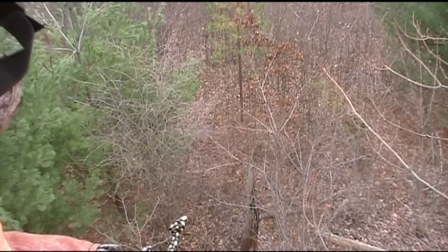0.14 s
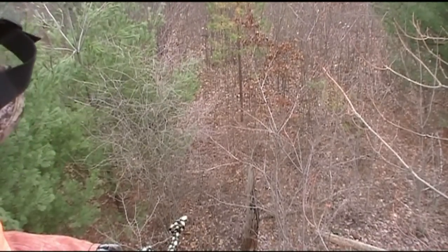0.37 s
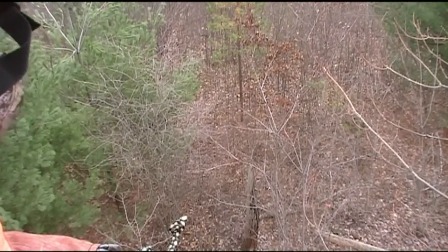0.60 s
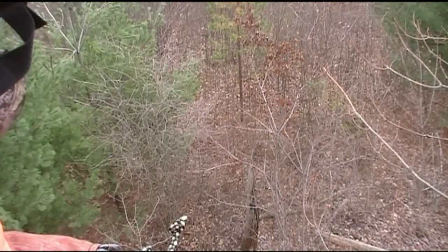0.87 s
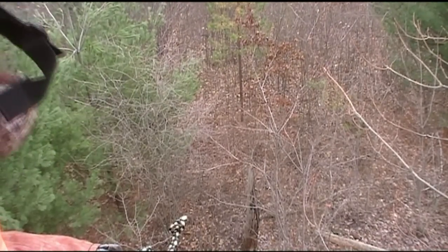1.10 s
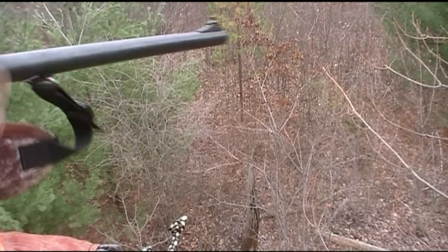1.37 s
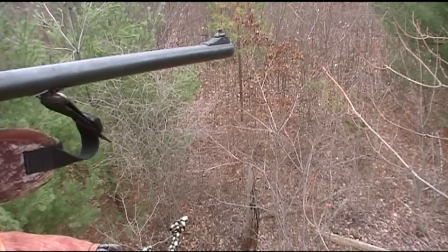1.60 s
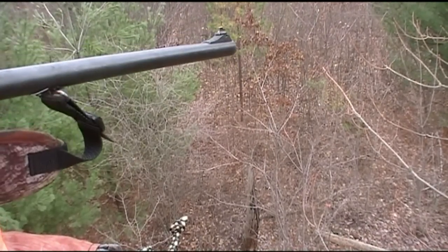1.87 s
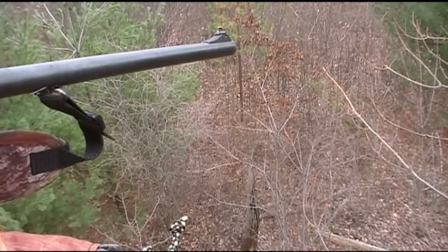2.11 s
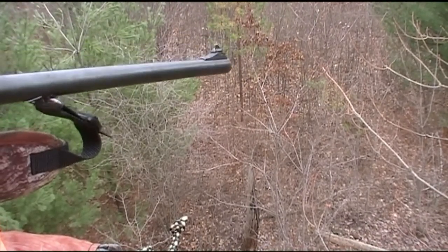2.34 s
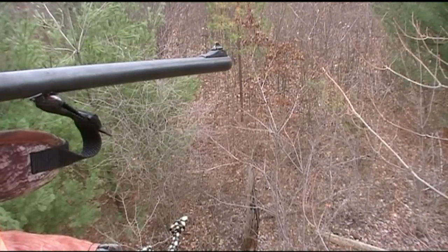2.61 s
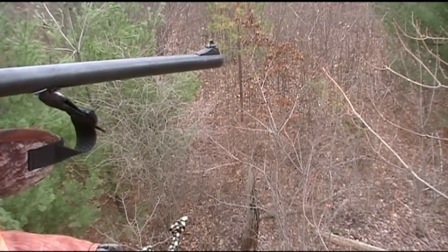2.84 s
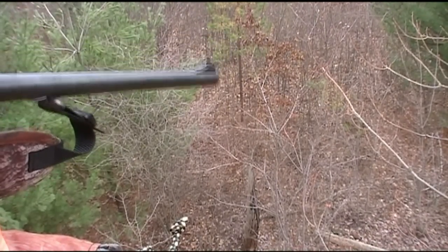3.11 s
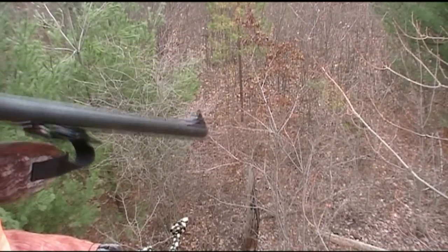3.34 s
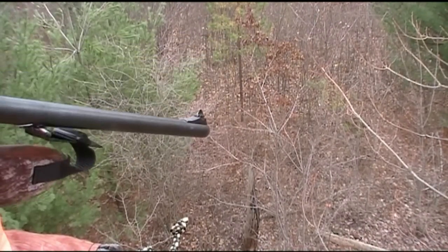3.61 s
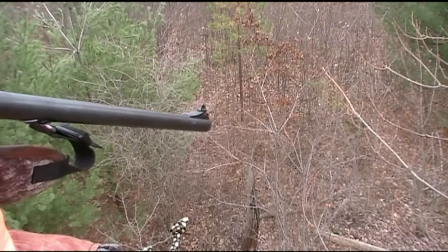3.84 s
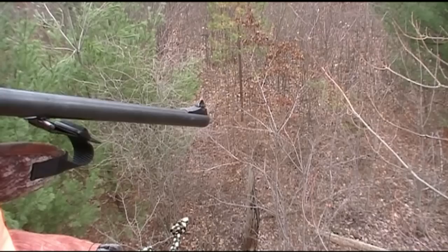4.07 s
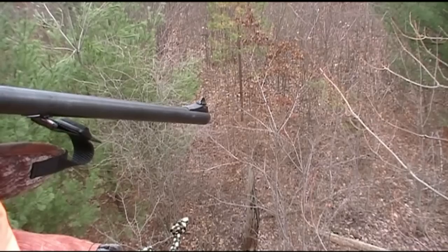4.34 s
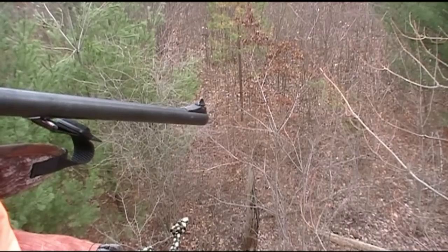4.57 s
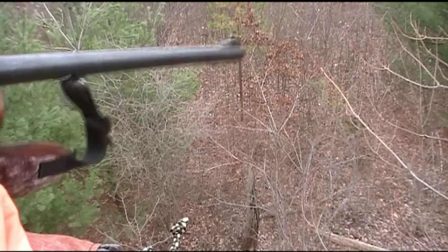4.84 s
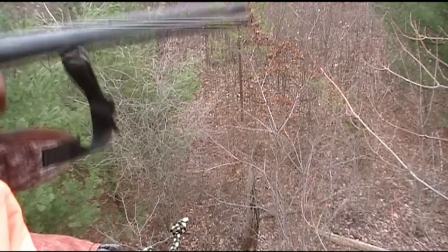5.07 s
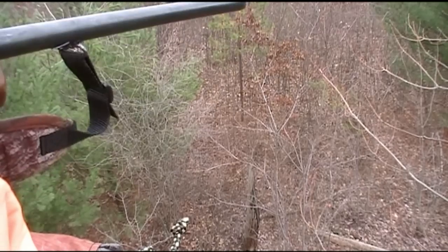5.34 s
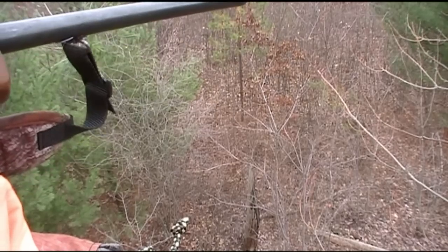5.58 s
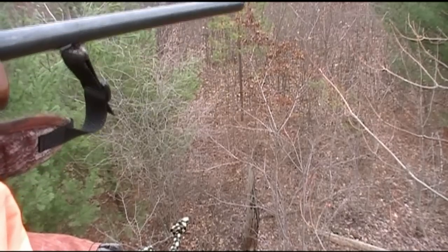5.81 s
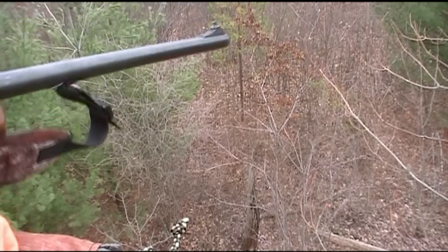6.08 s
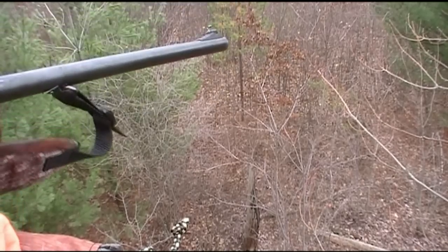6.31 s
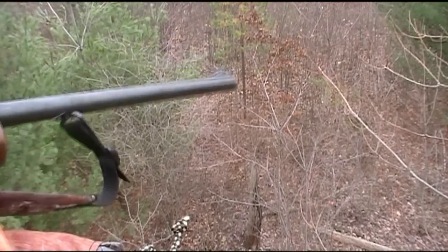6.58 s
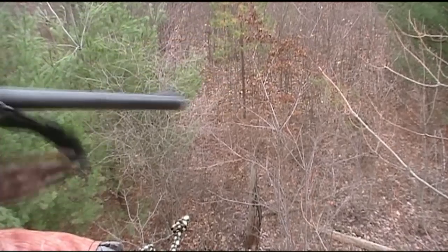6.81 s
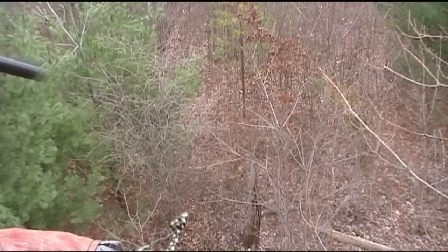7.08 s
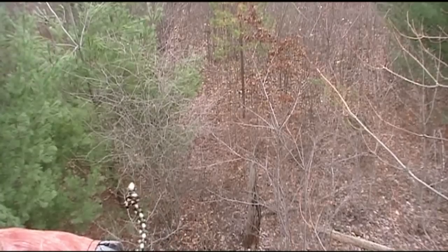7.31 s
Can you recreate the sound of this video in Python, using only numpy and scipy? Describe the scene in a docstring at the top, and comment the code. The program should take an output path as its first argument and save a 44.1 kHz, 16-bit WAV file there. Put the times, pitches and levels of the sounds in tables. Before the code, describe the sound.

Close jacket rustle and dull stock knocks, then hard bright metallic rifle clicks, more cloth swishing, wind puffs and deep wooden thumps in quiet woods.

```python
"""A rifle is raised, aimed and lowered close to the left of a microphone pair in bare woods.
First the jacket rubs and swishes (shaped noise) over faint air, with dull knocks of the stock.
From the third second, sling swivel and action click hard: contact noise rings modes of steel.
Gusts (low noise, opposed in the pair) grow later on, and the last knocks of the wood are deep.
Gain control ducks just after loud sounds; the loud clicks that outrun it clip."""
import sys
import numpy as np
from scipy import signal
from scipy.fft import rfft, irfft
from scipy.io import wavfile
from scipy.ndimage import uniform_filter1d

SR = 44100
rng = np.random.default_rng(int(sys.argv[2]) if len(sys.argv) > 2 else 0)


def inscribe(sig):
    """Save sig as 16-bit PCM at rate SR to the path in sys.argv[1].

    A 1-D sig is mono; a 2-D sig holds one channel per row.
    Samples are clipped to [-1, 1] before scaling.
    """
    pcm = np.round(np.clip(np.atleast_2d(sig).T, -1, 1) * 32767)
    wavfile.write(sys.argv[1], SR, pcm.astype(np.int16))


def makeup_ratio(level_db):
    """Linear amplitude ratio for a level in decibels (20 dB per factor of ten)."""
    decades = np.asarray(level_db, float) / 20
    return 10 ** decades


N = 327883  # samples

# All levels are set before each source's trim, the microphones and the gain control.
# metal clicks: start_s, level_db, pitch_hz, low_modes_db (below 5800 Hz, before a lift), rattle_s
METAL_CLICKS = [(0.5, -20.5, 5400, 4, 0.0052), (2.468, 5, 10230, -10, 0.0019),
                (2.5948, -20, 11900, 3, 0.00104), (2.6093, 6, 2900, -7, 0.0023),
                (2.611, -14.5, 2074, 1, .004), (3.2798, 3.5, 8500, -18, 0.002),
                (3.2803, -8.5, 5470, -10, 0.0022), (3.3201, 8, 5910, -13, 0.0034),
                (3.3235, 7, 11200, -19.5, 0.0032), (3.3293, 3.5, 3170, -11.5, 0.003),
                (3.336, -13, 6070, 0, 0.0061), (3.823, -19.5, 9100, -10, 0.005),
                (3.8406, -23, 12700, -3, 0.0032), (3.841, -7.5, 11550, 0.5, 0.0024),
                (4.7868, -19, 10000, -30, 0.0006), (4.7937, -17, 7570, -10, 0.00081),
                (4.7946, -1.5, 10650, -2, 0.0012), (4.808, -23.5, 2900, -1, 0.0035),
                (4.9348, -9.5, 11500, -38, 0.0031), (4.937, -6.5, 3230, -9, 0.002),
                (4.943, -8, 12200, -28, 0.00063), (4.957, -13, 6400, -30, 0.0025),
                (4.976, 0.5, 9040, -1.5, 0.0022), (5.2165, -10.5, 3700, 2, 0.007),
                (5.2186, 2.5, 6330, -18, 0.0042), (5.222, -2.5, 8700, -13.5, 0.0045),
                (5.228, -10, 1700, -7, 0.006), (5.233, 0, 9130, -25, 0.005), (5.232, -4.5, 3080, 3, 0.005),
                (5.241, -15, 7400, 4, 0.0065), (5.2504, -1.5, 9250, 2.5, 0.0022),
                (5.2685, -19, 9700, 2, 0.003), (6.3952, -12, 2154, 5, 0.003),
                (6.3958, -15, 2800, 19, 0.0033), (6.396, -10, 5600, 0, 0.0037)]
# modes of the steel parts, free of any grip: pitch_hz, level_db, t60_s
STEEL_MODES = [(720, -6.5, 0.046), (1100, -4, 0.051), (1420, -2, 0.024), (2065, -13, 0.045),
               (2250, -8.5, 0.015), (2900, 2.5, 0.021), (3700, -10.5, 0.052), (5400, -11, 0.028),
               (6080, -0.5, 0.022), (6760, 4, 0.017), (7400, 5.5, 0.011), (8520, 8, 0.0065),
               (9790, 6.5, 0.0063), (10530, 8, 0.0051), (11560, 2, 0.014), (11950, 7, 0.0025),
               (12630, -13, 0.017)]
# dull knocks and scrapes of the stock: start_s, level_db, pitch_hz, scrape_s, lean_factor (on the pair's level gap)
STOCK_KNOCKS = [(0.218, -33, 593, 0.0081, 1.2), (0.32, -30, 630, 0.0041, 1.9),
                (0.5016, -15.5, 410, 0.0047, 0.6), (0.515, -23, 760, 0.011, 0.45),
                (0.629, -33, 477, 0.0055, 0.5), (1.01, -28, 1180, 0.0052, 1.4),
                (1.291, -23.5, 1170, 0.0069, 1.4), (1.3085, -25, 1150, 0.0028, 1.2),
                (1.335, -24, 1120, 0.0044, 1.9), (1.472, -22.5, 1620, .012, 1.9),
                (3.084, -20, 1063, 0.0064, 4.7), (3.132, -24, 1210, 0.001, 2.6),
                (3.215, -29.5, 556, 0.0037, 2.2), (3.369, -21, 1270, 0.0039, 2),
                (3.584, -27, 610, 0.0051, 2), (3.71, -25, 645, 0.0091, 3.1), (3.846, -26, 880, 0.0035, 1.8),
                (3.893, -25.5, 553, 0.0071, 2), (4.032, -27, 1100, 0.0057, 1),
                (4.033, -19.5, 590, 0.0093, 0.99), (4.786, -25, 900, .004, 1.3),
                (4.795, -12.5, 840, 0.0049, 3.5), (4.8063, -11.5, 436, 0.007, 1.3),
                (4.817, -29, 400, .012, 1.6), (5.224, -14, 1140, .005, 1.5),
                (5.2332, -4.5, 1100, 0.0035, 1.8), (5.235, -9, 485, 0.0066, 2.5),
                (5.272, -17, 610, 0.0096, 0.29), (5.913, -24, 180, 0.0075, .1),
                (6.2754, -22, 560, 0.0058, .3), (6.2785, -20, 960, 0.007, 0.2),
                (6.397, -19, 940, 0.0152, 0.22), (6.595, -18.5, 298, 0.0017, 1.1),
                (6.618, -16, 200, 0.0092, 0.89), (6.654, -23, 300, 0.0063, 0.36),
                (6.674, -16.5, 200, 0.0065, 0.39), (6.956, -10, 216, 0.0064, 0.33),
                (6.971, -20, 300, 0.0042, 0.18), (7.168, -12, 290, 0.0058, 0.14)]
# modes of the wooden stock, free of any grip: pitch_hz, level_db, t60_s
STOCK_MODES = [(195, -1, .05), (300, -2, .05), (440, -2, .045), (600, -3, .04), (780, -4, .035),
               (935, -4, .045), (1200, -5, .035), (1600, -8, .025), (1950, -10, .02), (2800, -14, .015)]
# hollow drag of a sleeve, colour: frequency_hz, level_db (relative, per Hz)
DRAG_COLOUR = [(150, -16), (300, -5), (520, 1), (800, 0), (1250, -3.5), (1800, -12), (3000, -21),
               (8000, -52)]
# grainy rub of the jacket, colour: frequency_hz, level_db (relative, per Hz)
RUB_COLOUR = [(400, -21.5), (1000, -3), (1900, -0.5), (3000, -3), (4500, -7), (7000, -12.5), (11000, -10.5),
              (16000, -15.5)]
# bright swish of the slick shell, colour: frequency_hz, level_db (relative, per Hz)
SWISH_COLOUR = [(2000, -12.5), (4000, -3.5), (6500, -2), (8000, -2), (10000, 4), (12000, 0.5),
                (14000, -5.5), (16000, -19)]
# how busy the arms are between strokes: time_s, drag_db, swish_db
ARM_BUSYNESS = [(0, -40, -47.5), (.7, -45, -50), (1.2, -41, -40), (1.75, -40.5, -41.5), (2.27, -43, -45),
                (2.45, -40, -40.5), (2.5, -48.5, -47.5), (2.6, -40.5, -41), (3.02, -42.5, -50),
                (3.24, -52, -50), (3.28, -45.5, -54), (3.47, -53.5, -57), (3.8, -44, -53),
                (4.4, -43.5, -52), (4.75, -43.5, -52.5), (5.1, -40.5, -43), (5.4, -42, -49.5),
                (5.8, -43, -46), (6.3, -41.5, -43.5), (7.0, -40, -44.5), (7.44, -39.5, -39)]
# strokes of a sleeve on the jacket: peak_s, length_s, drag_db, rub_over_drag_db
SLEEVE_STROKES = [(0.253, 0.085, -54, 15), (0.374, 0.089, -37, 3), (0.58, 0.18, -37, 0),
                  (0.832, 0.06, -42, 5.5), (0.961, 0.021, -42, 5.5), (1.048, 0.037, -39, -1.5),
                  (1.222, 0.066, -44.5, 1.5), (1.498, 0.11, -30.5, 0.5), (1.616, 0.071, -29.5, 1),
                  (1.748, 0.14, -42.5, 6), (2.053, 0.0089, -44.5, 9), (2.151, 0.095, -52.5, 11.5),
                  (2.874, 0.11, -38, 4.5), (2.952, 0.037, -43, 7.5), (3.113, 0.064, -51, 8.5),
                  (3.216, 0.07, -40, 0), (3.368, 0.016, -41, 7), (3.582, 0.052, -48.5, 1.5),
                  (3.7, 0.028, -40, -5), (3.82, 0.035, -50.5, 15), (3.906, 0.092, -47, 3.5),
                  (4.056, 0.018, -41, 0), (4.516, 0.036, -40, 1), (4.872, 0.07, -46, 10.5),
                  (4.958, 0.048, -29.5, -0.5), (5.482, 0.066, -34, 2.5), (5.686, 0.17, -35, -2.5),
                  (5.997, 0.14, -38, 2), (6.138, 0.12, -35.5, 5), (6.475, 0.13, -34.5, 0.5),
                  (6.618, 0.083, -29, -11), (6.697, 0.061, -36.5, 7.5), (6.844, 0.089, -35, 7.5),
                  (6.97, 0.038, -30, -17), (7.085, 0.093, -34, -4.5), (7.204, 0.078, -28.5, -1.5)]
# swishes of the slick shell: peak_s, length_s, level_db
SHELL_SWISHES = [(0.0, 0.12, -44), (0.252, 0.043, -40), (0.403, 0.067, -40.5), (0.575, 0.16, -38.5),
                 (0.755, 0.019, -35.5), (0.826, 0.068, -35.5), (0.952, 0.038, -36.5), (1.044, 0.01, -34.5),
                 (1.083, 0.12, -40), (1.16, 0.013, -32.5), (1.28, .05, -36.5), (1.453, 0.2, -33),
                 (1.615, 0.14, -31.5), (1.824, 0.09, -37.5), (1.96, 0.039, -35.5), (2.095, 0.12, -42.5),
                 (3.128, 0.09, -46), (3.397, 0.041, -46.5), (3.68, 0.066, -47.5), (3.82, 0.01, -41),
                 (3.876, 0.018, -41), (4.037, 0.008, -34), (4.53, 0.084, -46), (4.853, 0.031, -40.5),
                 (4.934, 0.031, -51), (5.2, .05, -52), (5.478, 0.048, -35.5), (5.593, 0.092, -36),
                 (6.18, 0.094, -43), (6.434, 0.043, -29.5), (6.602, 0.16, -36.5), (6.742, 0.056, -37),
                 (6.97, .04, -43), (7.19, 0.079, -36), (7.337, 0.056, -28)]
# where the cloth moves, as a factor on the pair's lead: time_s, rub_left, swish_left
CLOTH_PLACE = [(0, 0.68, 0.13), (.7, 0.73, .05), (1.3, 0, 0), (1.45, 1.03, 1), (2.3, 0.07, 0.77),
               (3.0, 0.83, 0.87), (5.0, 0.88, 0.26), (5.9, 0.8, 1), (6.3, 0.07, 0.46), (6.45, 0.82, 0.17),
               (6.8, 0.48, 0), (7.44, 0.63, 0.34)]
# dry ticks of strap and seams: start_s, level_db, pitch_hz, left (factor on the pair's lead)
STRAP_TICKS = [(.656, -22, 7500, 0.2), (1.256, -21.5, 10000, 0.16), (1.0523, -22, 1590, 0.9),
               (1.813, -27, 10000, 0.4), (1.8242, -11, 5400, 0.7), (2.3217, -27, 7000, 0.86),
               (2.3694, -17.5, 3060, 0.93), (2.805, -21, 2170, 0.74), (4.032, -22.5, 3600, 0.3),
               (4.5088, -16.5, 2060, 1), (5.0657, -26.5, 2240, 1), (5.154, -23, 1390, 0.9),
               (5.1849, -23, 1430, 1), (5.458, -8, 2660, 0.95), (5.6395, -13, 1580, 0.64),
               (5.836, -13, 2900, 1), (6.3074, -21, 13000, 0.87), (6.595, -15, 5500, 0.6),
               (6.954, -15.5, 1900, 0.95), (7.003, -20, 12000, 0.9), (7.0283, -20.5, 8900, .8),
               (7.1667, -15.5, 1540, 0.8), (7.193, -19, 8000, .8), (7.313, -27, 10500, 0.8),
               (7.3723, -18, 7400, 0.7)]
# rising and falling breeze beneath the gusts: time_s, level_db
BREEZE = [(0, -43), (.7, -91), (1.4, -80), (2.2, -56), (3.9, -69), (4.6, -45.5), (5.2, -39), (6.1, -29.5),
          (6.4, -37.5), (7.44, -39.5)]
# gusts on the microphones: peak_s, length_s, level_db
WIND_GUSTS = [(0.102, 0.1, -46), (0.528, 0.036, -45), (2.045, 0.046, -38), (2.9, 0.059, -44.5),
              (3.616, 0.13, -49), (3.96, 0.027, -41), (4.056, 0.022, -30), (4.287, 0.19, -26),
              (4.907, 0.11, -35.5), (5.24, 0.093, -28.5), (5.477, 0.054, -29), (5.72, .07, -36),
              (5.901, 0.038, -16.5), (6.076, 0.063, -38), (7.194, 0.089, -35), (7.43, 0.039, -33)]
# wind pressure on the microphones, colour: frequency_hz, level_db (relative, per Hz)
BUFFET_COLOUR = [(15, -52.5), (25, 2.5), (112, 0), (168, 1), (355, -8), (719, -32), (810, -24), (900, -31),
                 (1170, -78), (1980, -120)]
# faint air of the woods, colour: frequency_hz, level_db (relative, per Hz)
AIR_COLOUR = [(35, -57), (60, -10), (371, -2.5), (1220, -15), (1310, -10), (1860, -6.5), (11800, -22),
              (16000, -17.5)]
# the pair hearing a source at its left, each column scaled by the source:
# frequency_hz, left_lead_rad, left_over_right_db, likeness (0-1)
MIC_PAIR = [(200, 3.43, 4.5, 0.94), (503, 3.58, 7, 0.71), (900, 3.25, 6.5, 0.56), (1910, 2.75, 11, 0.75),
            (2900, 2.18, 7.5, 1), (3970, 2.55, 4.5, 0.67), (5310, 3.85, 6, 0.88), (8100, 5.2, 6, 0.51),
            (11500, 8.2, 10.5, 0.75), (14100, 8.9, 1, 0.69)]


def clicks():
    """Swivel, latch and action: steel on steel, damped fast by the hands."""
    out = np.zeros((2, N))
    low = np.transpose(STEEL_MODES)[0][:, None] < 5800  # Hz
    highpass = signal.butter(2, 800, "high", fs=SR, output="sos")  # the clicks carry no deep thump
    for start_s, level_db, pitch_hz, low_db, rattle_s in METAL_CLICKS:
        modes = gripped(STEEL_MODES, pitch_hz)
        favour_db = near(modes, pitch_hz, boost_db=7, octaves=.2)
        # a harder blow shakes the grip loose and rings longer
        ring_factor = max(.55 + .008 * level_db, .3)
        tilt_db = low * (low_db + 3)
        sound = ring(modes, favour_db, tilt_db, ring_factor, rattle_s, crack=.12, blow=.6)
        sound = signal.sosfilt(highpass, sound)
        pair = paired(sound, left=0.9, lean=0.95, alike=1.104)
        add(out, start_s - 90 / SR, makeup_ratio(level_db + 9.5) * pair)
    return out


def knocks():
    """The wooden stock bumps and scrapes shoulder, hand and rail, ringing its damped modes."""
    out = np.zeros((2, N))
    highpass = signal.butter(3, 150, "high", fs=SR, output="sos")  # the knocks carry no deep bass
    for start_s, level_db, pitch_hz, scrape_s, lean in STOCK_KNOCKS:
        modes = gripped(STOCK_MODES, pitch_hz)
        favour_db = near(modes, pitch_hz, boost_db=8, octaves=.4)
        # a higher-pitched knock stirs the deeper modes less: 9 dB per octave below its pitch
        octaves_up = np.log2(np.transpose(STOCK_MODES)[0][:, None] / pitch_hz)
        tilt_db = 9 * np.minimum(octaves_up, 0)
        sound = ring(modes, favour_db, tilt_db, 0.71, scrape_s, crack=0.028, blow=0.33)
        sound = signal.sosfilt(highpass, sound)
        pair = paired(sound, left=0.81, lean=lean, alike=1.13)
        add(out, start_s - 60 / SR, makeup_ratio(level_db + 5.0) * pair)
    return out


def gripped(modes, hz):
    """The grip of the moment shifts the nearest mode onto the pitch of this blow and frees it."""
    held = np.array(modes, float)
    nearest = np.argmin(abs(np.log(held[:, 0] / hz)))
    freed_db = np.percentile(held[:, 1], 68)
    held[nearest, :2] = hz, max(held[nearest, 1], freed_db)
    return held


def near(modes, hz, boost_db, octaves):
    """Modes near the struck spot's own pitch ring louder."""
    away = np.log2(np.transpose(modes)[0] / hz) / octaves
    return boost_db * np.exp(-away ** 2)[:, None]


def ring(modes, favour_db, tilt_db, ring_factor, rattle_s, crack, blow):
    """A brief rattle of contacts drives every mode evenly, favoured ones louder and longer; two draws."""
    hz, db, t60 = np.transpose(modes)[..., None]
    t = np.arange(4096) / SR
    turn = t / max(rattle_s, 1e-4)
    rise = np.minimum(turn / .15, 1)
    fall = np.exp(-turn ** 3) + .15 * np.exp(-turn / 2)
    rattle = rng.standard_normal((2, len(t))) * rise * fall
    rattle[:, round(.2 * rattle_s * SR)] += blow * np.linalg.norm(rattle[0])  # one firm blow, early on
    rattle /= np.linalg.norm(rattle, axis=1, keepdims=True)
    detune = rng.uniform(0.98, 1.01, (2, len(modes), 1))
    decay_s = t60 * ring_factor * makeup_ratio(0.07 * favour_db)
    tones = np.sin(2 * np.pi * hz * detune * t)
    tones = makeup_ratio(db + favour_db + tilt_db - 60 * t / decay_s) * tones
    rung = signal.fftconvolve(rattle[:, None], tones, axes=2)[..., :len(t)]
    # each rung mode keeps the energy of its tone
    rung *= np.linalg.norm(tones, axis=2, keepdims=True) / np.linalg.norm(rung, axis=2, keepdims=True)
    contact = signal.lfilter([1, -1.2, .4], 1, rattle)  # brightened noise of the contacts
    return rung.sum(1) + crack * np.linalg.norm(tones[0]) * contact


def cloth():
    """Sleeves move on the jacket: a hollow drag, a grainy rub and a bright swish, all shaped noise."""
    t, coarse = np.arange(N) / SR, np.arange(0, N / SR, .004)
    busy_db, shell_db = along(ARM_BUSYNESS, coarse)
    rub_floor_db = -46 + 2.9 * (busy_db + 42.5)  # the rub grows faster than the drag as the arms get busy
    drag_strokes = [(s, length, db) for s, length, db, _ in SLEEVE_STROKES]
    rub_strokes = [(s, length, db + over_db) for s, length, db, over_db in SLEEVE_STROKES]
    shape = dict(rise=0.97, fall=0.99, point=2.1)
    drag_db = np.interp(t, coarse, swells(coarse, busy_db, drag_strokes, **shape))
    rub_db = np.interp(t, coarse, swells(coarse, rub_floor_db, rub_strokes, **shape))
    swish_db = np.interp(t, coarse, swells(coarse, shell_db, SHELL_SWISHES, **shape))
    rub_left, swish_left = along(CLOTH_PLACE, t)
    drag = texture(DRAG_COLOUR, patchy_db=1.5, left=1.29, lean=0.66, alike=0.31, grains=.5, size=512)
    rub = texture(RUB_COLOUR, patchy_db=2.5, left=rub_left, lean=0.78, alike=0.91, grains=.5)
    swish = texture(SWISH_COLOUR, patchy_db=2.5, left=swish_left, lean=0.15, alike=0.36, grains=.5)
    return makeup_ratio(drag_db - 1.7) * drag + makeup_ratio(rub_db + 0.5) * rub + makeup_ratio(swish_db + 3.5) * swish


def ticks():
    """Strap and seams snap: a cycle or two at each tick's pitch, with a puff of noise."""
    out, t = np.zeros((2, N)), np.arange(2048) / SR
    for start_s, level_db, pitch_hz, left in STRAP_TICKS:
        tone = np.sin(2 * np.pi * pitch_hz * t) * np.exp(-t * pitch_hz / .6)
        puff = .35 * rng.standard_normal((2, len(t))) * np.exp(-t / .0005)
        highpass = signal.butter(2, pitch_hz / 3, "high", fs=SR, output="sos")  # too small to push bass
        snap = signal.sosfilt(highpass, tone + puff)
        pair = paired(snap, left, lean=0.27, alike=1.0)
        add(out, start_s - 70 / SR, makeup_ratio(level_db + 8.0) * pair)
    return out


def wind():
    """Lumpy low pressure that pushes the two microphones in opposite senses."""
    coarse = np.arange(0, N / SR, .004)
    breeze_db, = along(BREEZE, coarse)
    gusty_db = swells(coarse, breeze_db, WIND_GUSTS, rise=0.99, fall=1.36, point=2.6)
    level_db = np.interp(np.arange(N) / SR, coarse, gusty_db)
    push, stray = texture(BUFFET_COLOUR, patchy_db=2.05, left=0, lean=0, alike=0, grains=0, size=2048)
    eddies = uniform_filter1d(rng.standard_normal(N), size=450)
    eddies = evened(uniform_filter1d(eddies, size=450))
    eddy_db = 2.8 * eddies  # quick rise and fall
    return makeup_ratio(level_db - 2.5 + eddy_db) * np.array([push, -.9 * push + 0.58 * stray])


def air():
    """The faint air of the woods: softly coloured noise at one level throughout."""
    return makeup_ratio(-46) * texture(AIR_COLOUR, patchy_db=3.5, left=1.3, lean=0.083, alike=0.23, grains=0, size=1024)


def texture(points, patchy_db, left, lean, alike, grains, size=256):
    """Noise mixed with a share of tiny snaps, coloured, patchy in time and pitch; rms 1."""
    snaps = makeup_ratio(3.0 * np.minimum(rng.exponential(1, (2, N)), 4))
    snaps = snaps * (rng.random((2, N)) < 1500 / SR)  # about 1500 a second
    snaps = evened(snaps * rng.choice([-1, 1], (2, N)))
    drive = rng.standard_normal((2, N)) + grains * snaps
    overlap = size * 3 // 4
    hz, t, z = signal.stft(drive, SR, nperseg=size, noverlap=overlap)
    patches = uniform_filter1d(rng.standard_normal(z[0].shape), size=6, axis=0)
    patches = evened(uniform_filter1d(patches, size=24, axis=1))
    left_then = np.interp(t, np.arange(N) / SR, left * np.ones(N))
    z = as_pair(z[0], z[1], hz, left_then, lean, alike)
    z = z * makeup_ratio(read(points, hz)[:, None] + patchy_db * patches)
    return evened(signal.istft(z, SR, nperseg=size, noverlap=overlap)[1][:, :N])


def swells(t, floor_db, rows, rise, fall, point):
    """Level in dB of humps added in power to a floor; rise and fall scale length, point 1 sharp, 2 round."""
    s, length, db = np.transpose(rows)[..., None]
    away = np.maximum((s - t) / rise, (t - s) / fall) / length
    humps_db = db - 10 * away ** point
    return 10 * np.log10(makeup_ratio(2 * floor_db) + makeup_ratio(2 * humps_db).sum(0))


def as_pair(z, other, hz, left, lean, alike):
    """Spectra of both microphones: by the pair's table the right one lags, is weaker and partly alike."""
    lead, over_db, same = read(MIC_PAIR, hz)[..., None]
    same = np.clip(same * alike, 0, 1)
    right = same * z * np.exp(-1j * lead * left) + np.sqrt(1 - same ** 2) * other
    return np.array([z * makeup_ratio(over_db * lean / 2), right * makeup_ratio(-over_db * lean / 2)])


def paired(sounds, left, lean, alike):
    """Two like sounds made into one heard by the pair, left peak 1."""
    hz = np.fft.rfftfreq(sounds.shape[1], 1 / SR)
    first, second = rfft(sounds)[..., None]
    pair = irfft(as_pair(first, second, hz, left, lean, alike)[..., 0])
    pair = np.roll(pair, 64, 1)[:, :len(hz)]  # room for what comes out ahead of the start
    return pair / abs(pair[0]).max()


def evened(x):
    """Scales to rms 1."""
    return x / np.sqrt(np.mean(x ** 2) + 1e-20)


def read(points, hz):
    """Every column of a table over frequency, joined on a log axis."""
    f, *columns = np.transpose(points)
    return np.squeeze([np.interp(np.log(hz + 1), np.log(f + 1), c) for c in columns])


def along(rows, t):
    """Every column of a curve at times t."""
    s, *columns = np.transpose(rows)
    return [np.interp(t, s, c) for c in columns]


def add(mix, s, sound):
    """Mixes a two-channel sound in at time s."""
    part = mix[:, round(s * SR):][:, :sound.shape[1]]
    part += sound[:, :part.shape[1]]


def scene():
    """Rifle, jacket and strap in the wind, over the faint air of the woods."""
    return clicks() + knocks() + cloth() + ticks() + wind() + air()


def roll_off(x):
    """The treble ends steeply here."""
    return signal.sosfilt(signal.butter(12, 16220, fs=SR, output="sos"), x)


def record(dry):
    """Gain control falls just after loud sounds and creeps back; what outruns it clips."""
    highpass = signal.butter(2, 90, "high", fs=SR, output="sos")  # the capsules shed deep bass
    lowpass = signal.butter(2, 12000, fs=SR, output="sos")  # and the top treble
    dry = signal.sosfilt(lowpass, signal.sosfilt(highpass, dry))
    # origin=599 makes each average look back only
    power = uniform_filter1d((dry ** 2).mean(0), size=1200, origin=599)
    power_db = 10 * np.log10(abs(power) + 1e-12)
    recovery_db = np.arange(N) * 21.9 / SR  # the held level falls 21.9 dB a second
    held_db = np.maximum.accumulate(power_db + recovery_db) - recovery_db
    over_db = np.maximum(held_db + 17.5, 0)  # above a threshold of -17.5 dB
    duck_db = 0.6 * uniform_filter1d(over_db, size=1200, origin=599)
    mix = np.clip(dry / makeup_ratio(duck_db), -1, 1)
    return roll_off(mix)


dry = scene()
out = record(dry)
inscribe(out)
```